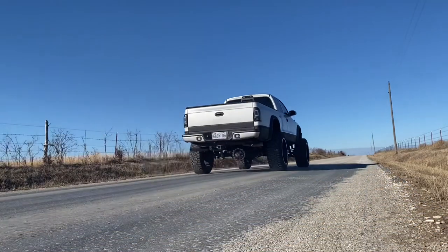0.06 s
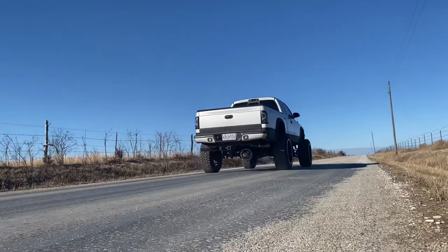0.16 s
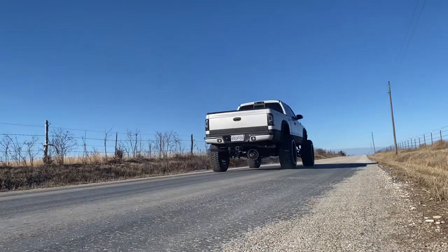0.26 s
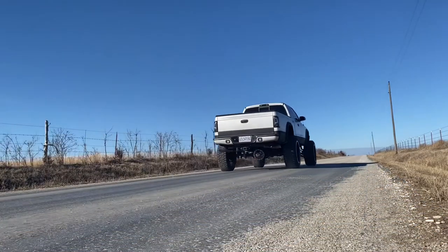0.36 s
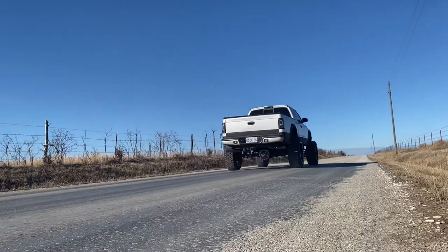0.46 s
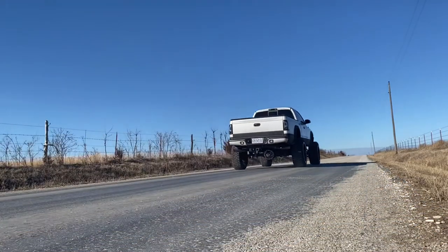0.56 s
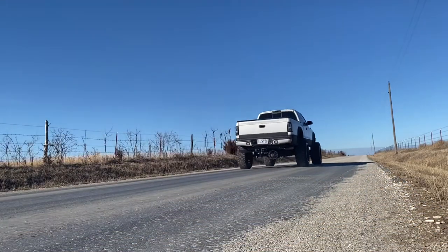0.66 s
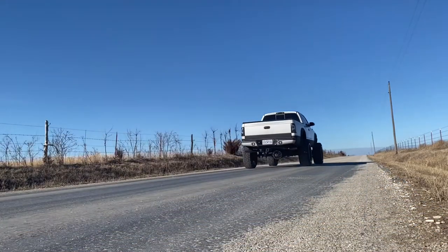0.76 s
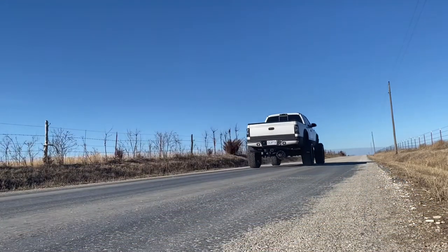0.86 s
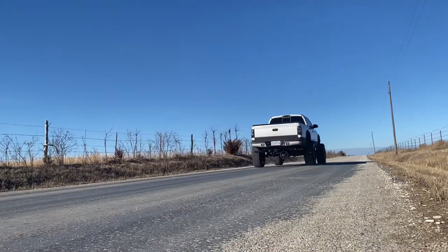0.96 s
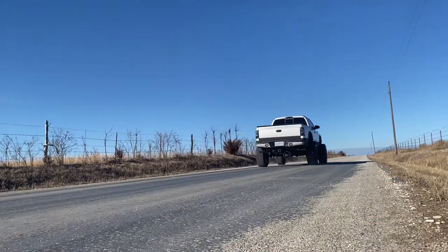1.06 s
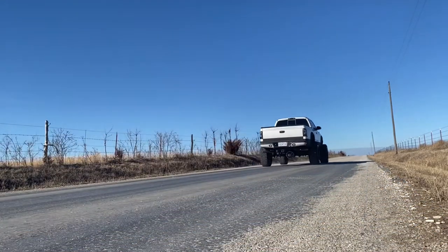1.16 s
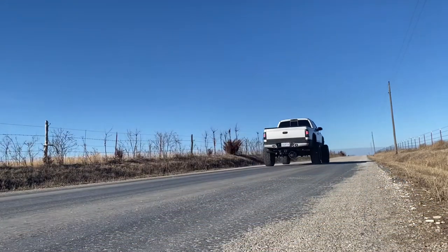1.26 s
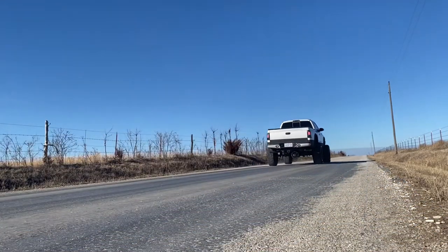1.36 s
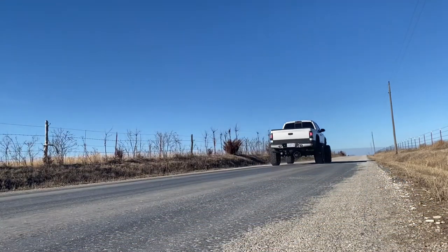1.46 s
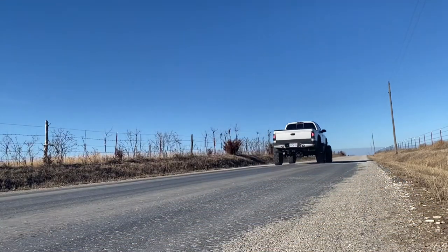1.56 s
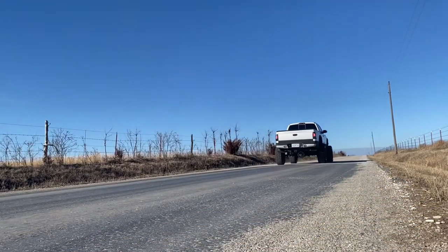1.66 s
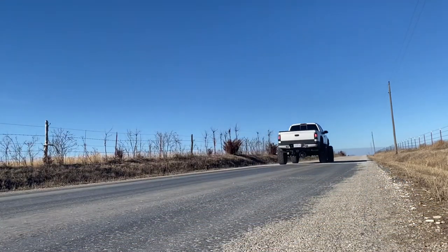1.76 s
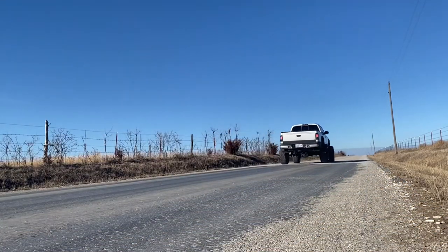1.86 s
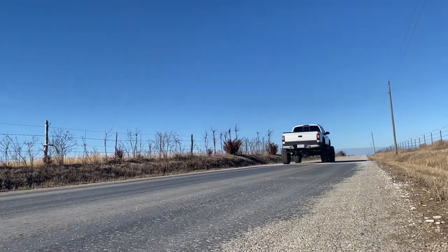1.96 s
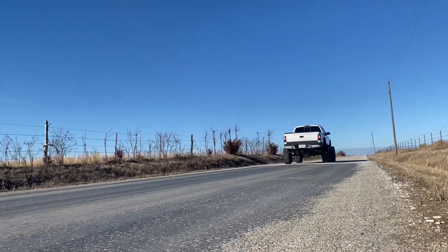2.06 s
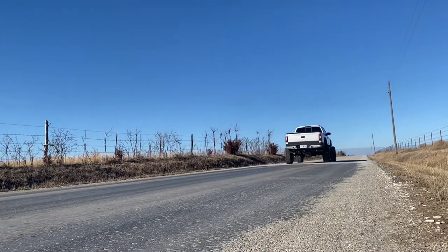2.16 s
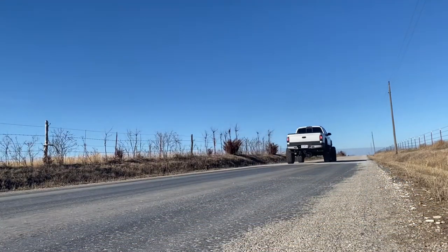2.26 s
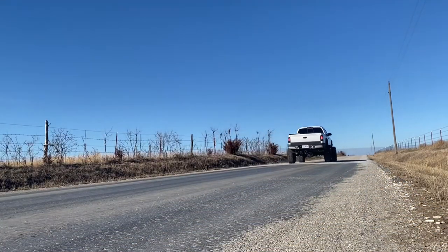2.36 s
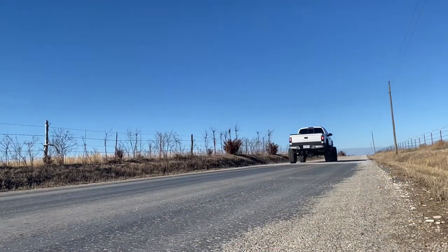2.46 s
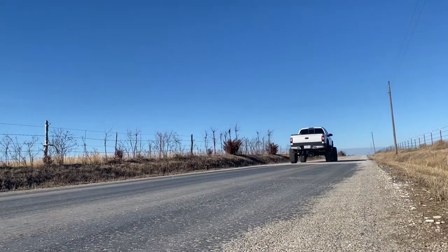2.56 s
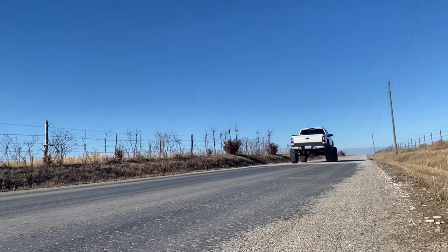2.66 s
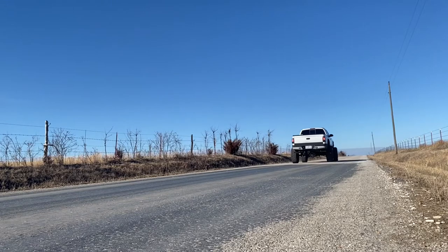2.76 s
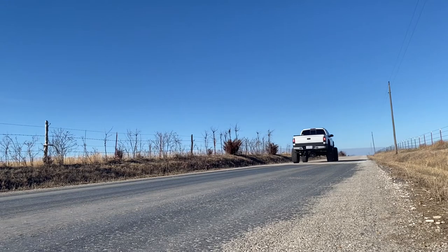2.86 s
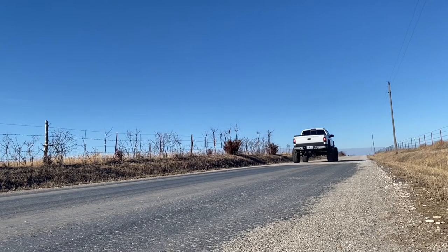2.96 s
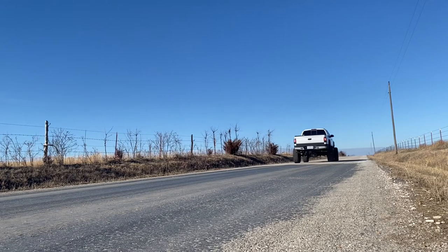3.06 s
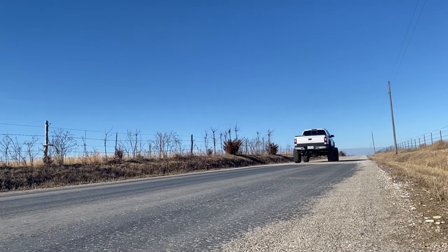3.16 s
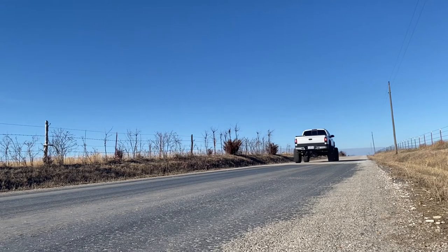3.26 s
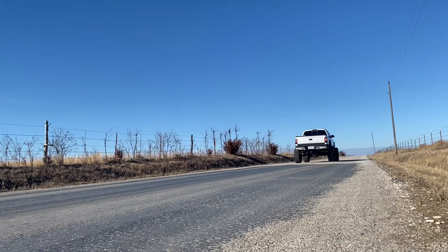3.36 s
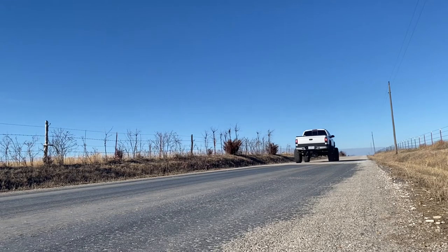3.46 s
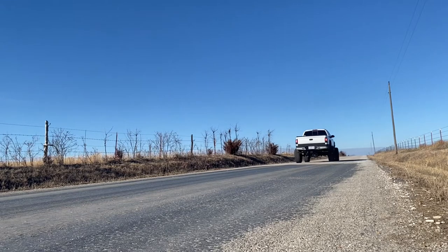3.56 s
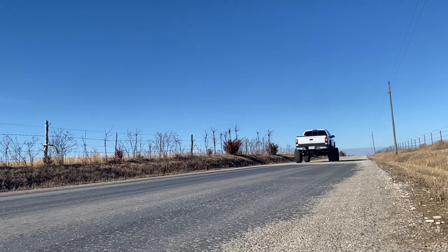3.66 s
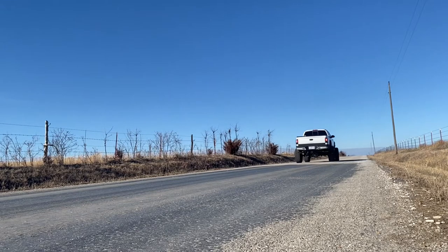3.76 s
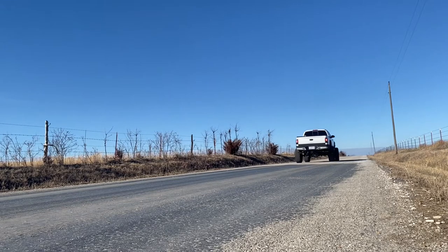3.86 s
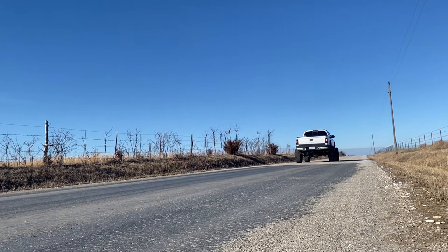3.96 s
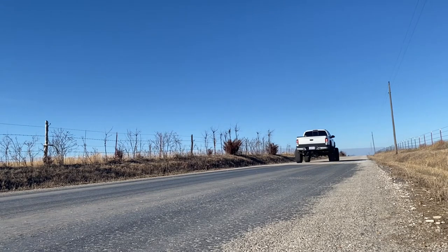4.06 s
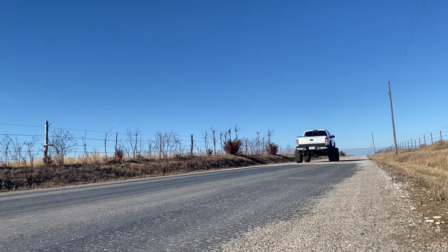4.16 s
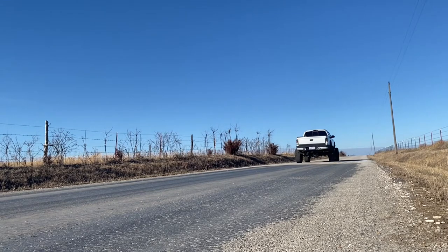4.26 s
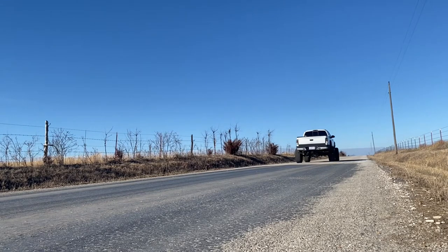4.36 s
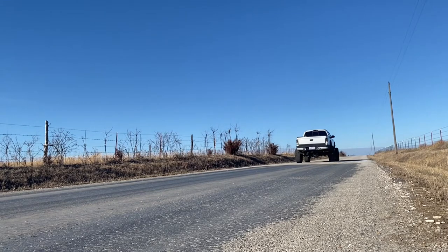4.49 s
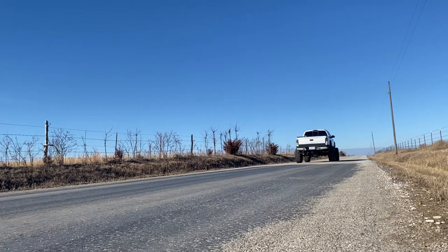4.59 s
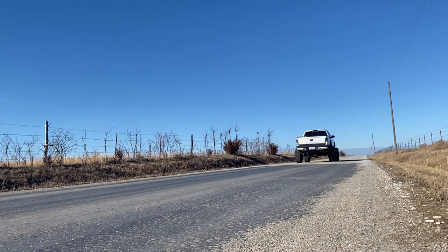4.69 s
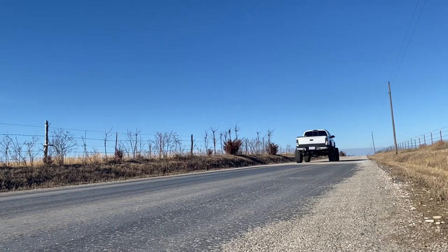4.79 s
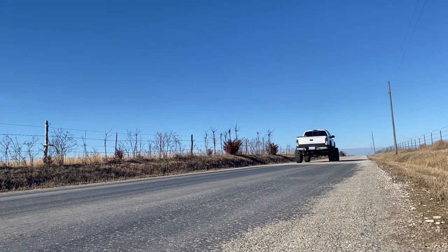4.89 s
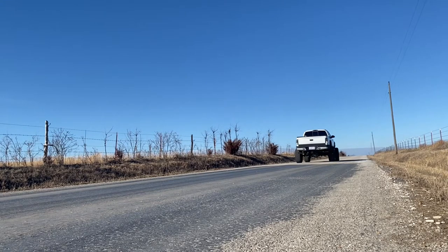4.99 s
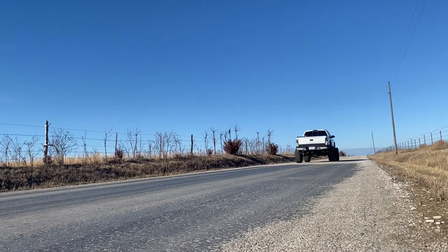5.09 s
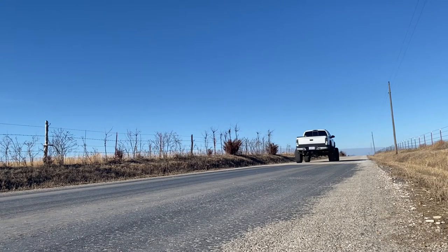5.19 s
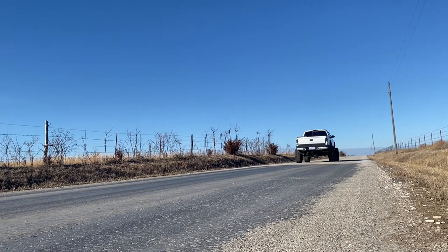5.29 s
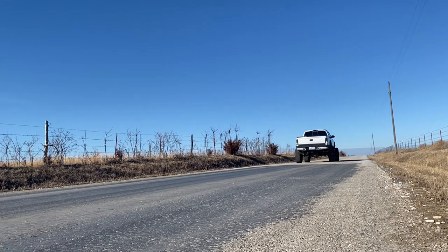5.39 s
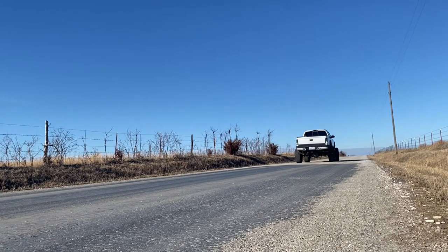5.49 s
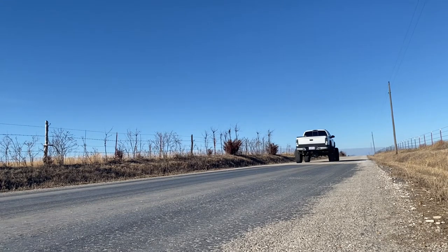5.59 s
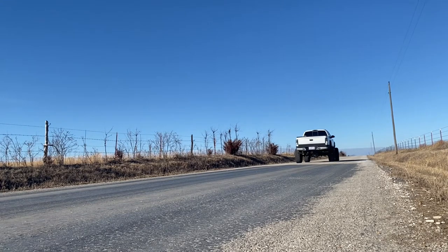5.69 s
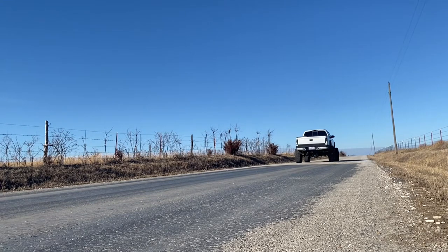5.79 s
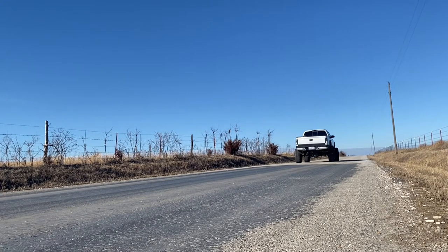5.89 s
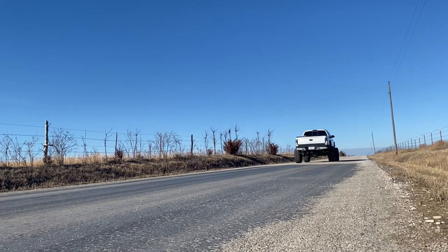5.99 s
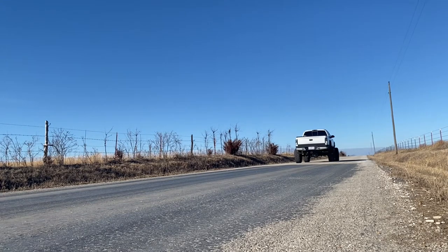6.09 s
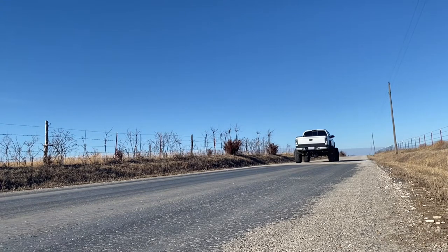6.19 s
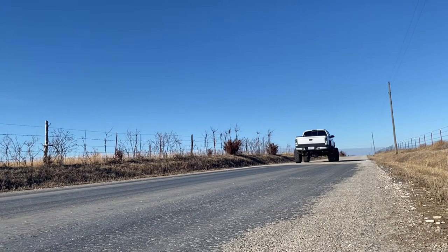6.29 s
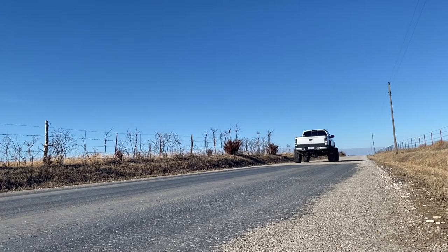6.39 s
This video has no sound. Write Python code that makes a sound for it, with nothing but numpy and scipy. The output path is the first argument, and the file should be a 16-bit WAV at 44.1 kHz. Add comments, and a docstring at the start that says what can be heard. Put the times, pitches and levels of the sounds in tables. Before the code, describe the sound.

On an open rural roadside, a lifted V8 pickup is already close and moving away. From 0 s a deep, pulsing exhaust drone around 160 Hz sits over broad, gritty tyre roar, while wind rumbles on the microphone. Engine speed rises to about 1.9 s, the drone fullest near 1 s; very short, thin brake squeaks occur near 0.2 and 1.4 s. Tyres fade steadily and revs sink as the truck halts at 3.1 s, with hard wind thumps around 2.5 s. A low idle remains, with light clatter and dull knocks. From about 4 s the engine climbs, raspy and rattling, peaking near 5.1 s with a strong drone, then sinks to a quieter lull around 5.9 s. At 6.0 s it revs abruptly, brighter and harsher, with clatter and rushing intake air, still high when the sound cuts at 6.4 s. Small gusts continue throughout.

```python
"""A throbbing engine drone, over tyre roar and wind, opens the scene: a V8 pickup rolls away and brakes to a halt.
Uneven firing pulses ring pipe resonances for the drone, and rasp and clatter grow as the throttle opens.
Coloured noise makes the tyres, fan, rushing air and wind; short wavering tones make the brake squeaks.
Knocks are short noise bursts. After the halt the engine revs up, sinks and revs up again."""
import sys
import numpy as np
from scipy import signal
from scipy.fft import rfft, irfft, next_fast_len
from scipy.io import wavfile
from scipy.ndimage import uniform_filter1d

SR = 44100
rng = np.random.default_rng(int(sys.argv[2]) if len(sys.argv) > 2 else 0)


def master(y):
    """Save y as 16-bit WAV."""
    cut = np.clip(np.atleast_2d(y).T, -1, 1)
    pcm = np.round(cut * 32767)  # scale
    wavfile.write(sys.argv[1], SR, pcm.astype(np.int16))


N = 284004
TIME = np.arange(N) / SR  # seconds

# Engine speed. Each row: time in seconds, four-stroke cycles per second.
ENGINE_SPEED = [(0, 7.15), (.75, 7.15), (1.45, 8.12), (1.9, 8.26), (2.3, 7.7), (2.7, 5.91), (3.05, 5.62),
                (3.45, 5.52), (3.75, 5.66), (4.1, 5.93), (4.35, 6.43), (4.6, 6.81), (4.9, 7.65),
                (5.15, 7.81), (5.45, 7.42), (5.75, 6.51), (5.98, 5.98), (6.12, 6.6), (6.26, 7.99),
                (6.44, 7.94)]
# Throttle, given as a level that steers the engine sounds. Each row: time in seconds, level in dB.
THROTTLE_LEVEL = [(2.7, -96), (2.95, -65.5), (3.5, -64), (3.8, -63.5), (4.15, -63), (4.9, -58.5),
                  (5.5, -60), (5.7, -66), (5.9, -70.5), (6.02, -64.5), (6.1, -56.5), (6.2, -54),
                  (6.44, -54.5)]
# Colour of white turbulence, equally strong at every pitch. Each row: frequency in Hz, relative level in dB.
WHITE = [(30, 0), (15000, 0)]
IDLE_CYCLES_PER_S, CLOSED_THROTTLE_DB = 5.5, -65
# The truck slows evenly from its starting distance until it halts.
START_M, HALT_M, HALT_S = 8.9, 14.2, 3.12
VALVE_LAG_S = .009  # a valve tap follows each rap by this much


def from_db(db):
    """Turn decibels into a plain gain."""
    return 10 ** (np.asarray(db) / 20)


def rms_one(x):
    """Scale a sound to an average (rms) level of 1."""
    return x / np.sqrt(np.mean(x ** 2) + 1e-20)


def in_time(rows):
    """One curve per column after the time, joined by straight lines."""
    s, *columns = np.transpose(rows)
    return [np.interp(TIME, s, column) for column in columns]


def at_hz(points, hz):
    """Read a spectrum between its points on a log-frequency axis."""
    knots, values = np.transpose(points)
    return np.interp(np.log(hz + 1e-3), np.log(knots), values)


def band(x, low_hz, high_hz):
    """Keep the sound between two frequencies (Butterworth band-pass)."""
    return signal.sosfilt(signal.butter(2, [low_hz, high_hz], "band", fs=SR, output="sos"), x)


def evened(x, low_hz, high_hz, seconds):
    """Scale the sound so that its running level inside a band is about 1."""
    power = np.mean(np.atleast_2d(band(x, low_hz, high_hz)) ** 2, axis=0)
    size = int(seconds * SR)
    smooth_power = uniform_filter1d(uniform_filter1d(power, size), size)
    return x / np.sqrt(smooth_power + 1e-20)


def noise(colour, gate=1):
    """Stereo noise, gated and then coloured, with an rms of 1; left and right are partly alike."""
    # How alike left and right are. Each row: frequency in Hz, likeness from 0 to 1.
    likeness = [(30, 0.59), (80, .93), (163, 0.65), (290, .8), (600, 0.92), (1100, 1), (2080, 1), (4000, 1),
                (4700, 0.67), (5300, 0.54), (6200, 0.39), (7200, 1), (8000, .7), (9000, 1), (12000, .9)]
    size = next_fast_len(N + 4096)
    hz = np.fft.rfftfreq(size, 1 / SR)
    mid, side = rfft(rng.standard_normal((2, N)) * gate, size) * from_db(at_hz(colour, hz))
    alike = np.clip(at_hz(likeness, hz), 0, .995)
    spectrum = np.sqrt(1 + alike) * mid + np.sqrt(1 - alike) * side * [[1], [-1]]
    return rms_one(irfft(spectrum, size)[:, :N])


def resonate(x, modes):
    """Add up resonances side by side; a narrower one rings for longer."""
    out = 0
    for hz, width_hz, db in modes:
        r = np.exp(-np.pi * width_hz / SR)  # how much of the ringing survives each sample
        feed = [(1 - r * r) / 2, 0, (r * r - 1) / 2]
        ringing = [1, -2 * r * np.cos(2 * np.pi * hz / SR), r * r]
        out = out + from_db(db) * signal.lfilter(feed, ringing, x + 1e-18)
    return out


def ring_steeply(x, hz, width_hz, db):
    """One resonance applied twice, for steep flanks."""
    return resonate(resonate(x, [(hz, width_hz, db)]), [(hz, width_hz, 0)])


def swell(s, half):
    """A bell-shaped rise and fall, down to about 0.6 at half seconds from its peak."""
    return np.exp(-.5 * ((TIME - s) / half) ** 2)


def placed(x, pan_db):
    """Left louder than right by pan_db."""
    return x * from_db([[pan_db / 2], [-pan_db / 2]])


def roadside(x, db=-18.5):
    """Three weak echoes return from the verges and the earth bank."""
    out = x.copy()
    for k, lag_s in enumerate([.0137, .0291, .0523]):
        lag = int(lag_s * SR)
        out[:, lag:] += from_db(db - 2 * k) * x[:, :-lag]
    return out


def road_speed():
    """Speed as a share of the starting speed, falling evenly to zero."""
    return np.clip(1 - TIME / HALT_S, 0, 1)


def nearness():
    """Gain that falls as distance grows, 1 where the truck halts."""
    return HALT_M / (HALT_M - (HALT_M - START_M) * road_speed() ** 2)


def crank_turns(start_turn=.48):
    """Four-stroke cycles counted so far: the engine speed summed over time."""
    return start_turn + np.cumsum(in_time(ENGINE_SPEED)[0]) / SR


def octaves_above_idle():
    """Engine speed in doublings above idle."""
    return np.log2(in_time(ENGINE_SPEED)[0] / IDLE_CYCLES_PER_S)


def firings(uneven_db, jitter_ms, pipe_delays=True):
    """Eight pulses a cycle, each with its cylinder's strength, pipe delay if wanted, and a little chance."""
    # Cylinders in firing order. Each row: strength in dB, lateness at the tailpipe in milliseconds.
    cylinders = [(-2, 0.63), (2.5, 1.88), (-0.9, 3), (3, 0.39), (2.5, 2.5), (-4.5, 2.5), (2, 1.5), (2, 5)]
    turns = crank_turns()
    count = np.arange(np.ceil(turns[0] * len(cylinders)), turns[-1] * len(cylinders)).astype(int)
    db, late_ms = np.array(cylinders)[count % len(cylinders)].T
    chance = rng.standard_normal((len(count), 2))
    on_time = np.interp(count / len(cylinders), turns, TIME)
    s = on_time + (late_ms * pipe_delays + jitter_ms * chance[:, 0]) / 1000
    pulses = np.zeros(N)
    pulses[np.clip(s * SR, 0, N - 1).astype(int)] = from_db(db + uneven_db * chance[:, 1])
    return pulses


def varied(pulses, spread_db):
    """The same pulses, each made stronger or weaker by chance."""
    out = pulses.copy()
    out[pulses > 0] *= from_db(spread_db * rng.standard_normal(np.count_nonzero(pulses)))
    return out


def puffs(pulses, decay_s):
    """Each firing lets out a puff of gas that dies away exponentially."""
    return rms_one(signal.lfilter([1], [1, -np.exp(-1 / (decay_s * SR))], pulses))


def pipe_gain(law):
    """A pipe tone grows with throttle and revs, shifts in level while rolling, and fades with distance."""
    idle_db, throttle_share, db_per_octave, rolling_db = law
    throttle_db = np.maximum(in_time(THROTTLE_LEVEL)[0] - CLOSED_THROTTLE_DB, 0)
    engine_db = idle_db + throttle_share * throttle_db + db_per_octave * octaves_above_idle()
    return nearness() * from_db(engine_db + rolling_db * np.sqrt(road_speed()))


def exhaust(pulses):
    """Firing pulses and turbulent gas make the pipes boom, and growl and bark at higher resonances."""
    # Pipe and silencer resonances. Each row: frequency in Hz, width in Hz, relative strength in dB.
    drone_modes = [(60, 5.6, -29.5), (105, 14, -29), (160.6, 12.6, 12), (174, 5.4, -19.5)]
    growl_modes = [(236.6, 4.4, -3.5), (262.3, 9.6, 1.5), (294.3, 7, -3.5), (345, 20, -15)]
    bark_modes = [(464.4, 5.4, -1.1), (494.3, 6.7, 0.7)]
    # Drone at the pipes' quarter-wave note. Each row: time in seconds, level in dB before throb and trim.
    drone_level = [(0, -20), (0.75, -20.5), (1.05, -17), (1.5, -25), (2.6, -27), (3.0, -38.5),
                   (3.65, -25.5), (4.25, -45), (4.58, -35.5), (4.7, -23.5), (4.87, -18.5), (5.5, -20),
                   (5.7, -33.5), (6.05, -37), (6.22, -20), (6.44, -43.5)]
    # How deeply the drone surges once a cycle. Each row: engine cycles per second, depth in dB.
    throb_depth = [(7.45, 1.2), (7.8, 4.2)]
    # How growl and bark grow. Each holds: dB at idle, share of the throttle's rise,
    # dB per octave of engine speed, dB added at the starting road speed.
    growl_law = (-47.5, 1.03, 11.5, -2)
    bark_law = (-57, .5, 8.5, 8.5)
    depth_db = np.interp(in_time(ENGINE_SPEED)[0], *np.transpose(throb_depth))
    throb_db = depth_db * np.cos(2 * np.pi * crank_turns())
    turbulence = noise(WHITE, puffs(pulses, decay_s=0.012))
    smooth_flow = rms_one(pulses) + from_db(-17) * turbulence
    rough_flow = rms_one(pulses) + from_db(-5) * turbulence
    drone = evened(band(resonate(smooth_flow, drone_modes), 45, 225), 140, 190, .16)
    growl = band(band(resonate(rough_flow, growl_modes), 205, 385), 205, 385)  # twice, for steep flanks
    growl = evened(growl, 220, 390, .16)
    bark = evened(band(resonate(rough_flow, bark_modes), 440, 540), 450, 520, .16)
    lows = drone * from_db(in_time(drone_level)[0] + throb_db - 1.48) + growl * pipe_gain(growl_law)
    return placed(lows, pan_db=0.65) + placed(bark * pipe_gain(bark_law), pan_db=-0.5)


def tyres():
    """Tread roar is noise with a fine crackle of grit, fading as the truck draws away and slows."""
    # Each row: frequency in Hz, relative level in dB per Hz.
    tyre_colour = [(150, -15.5), (290, -9), (350, 6.5), (410, -7.5), (620, -2), (740, 1.5), (785, -3),
                   (850, 3), (960, -6), (1150, -6), (1450, -15.5), (2000, -16.5), (2900, -27.5),
                   (4100, -30), (5200, -35.5), (6200, -40.5), (7200, -37), (9000, -43), (11000, -42.5),
                   (15000, -49)]
    start_db, speed_power = -37.5, 0.57  # level at the start; power of road speed it follows
    grit = (rng.random(N) < 300 / SR) * np.minimum(rng.exponential(3.2, N), 9)  # about 300 grains a second
    roar = evened(noise(tyre_colour, 1 + grit), 550, 1600, 0.22)
    gain = from_db(start_db) * road_speed() ** speed_power * nearness() * START_M / HALT_M
    return placed(roar * gain, pan_db=-0.2)


def fan():
    """The cooling fan is a smooth noise hiss that gets louder with engine speed."""
    # Each row: frequency in Hz, relative level in dB per Hz.
    fan_colour = [(350, -11.5), (820, -2), (1450, -17.5), (2200, -14), (3300, -28.5), (4200, -25.5),
                  (5300, -29), (6000, -39), (9000, -43), (14000, -53.5)]
    idle_db, db_per_octave = -62, 12.5
    gain = from_db(idle_db + db_per_octave * octaves_above_idle())
    return placed(noise(fan_colour) * gain, pan_db=0.0)


def wind(steady_db=4.5):
    """Wind rumbles at the microphone; gusts swell it, and their sharp eddies reach higher in pitch."""
    # Colours of the rumble and of the sharp eddies. Each row: frequency in Hz, relative level in dB per Hz.
    wind_colour = [(20, -37), (32, -19), (48, -7.5), (70, -3.5), (110, -7), (170, -12.5), (260, -28.5),
                   (500, -45), (1500, -77), (6000, -115)]
    buffet_colour = [(30, -15), (70, 1.5), (130, 4.5), (230, 2), (330, -7.5), (450, -17.5), (580, -30),
                     (1500, -59.5), (6000, -100)]
    # Steady part of the wind. Each row: time in seconds, level in dB before steady_db is added.
    wind_level = [(0.05, -24.5), (0.3, -35), (0.85, -33.5), (1.35, -35.5), (1.7, -32.5), (1.95, -33),
                  (2.3, -31.5), (2.7, -29.5), (2.9, -37), (3.15, -44.5), (3.4, -44), (3.6, -38),
                  (3.95, -42), (4.4, -36.5), (5.1, -39), (5.65, -37.5), (5.87, -42.5), (6.1, -34),
                  (6.4, -36.5)]
    # Gusts. Each row: peak in seconds, level in dB, half length in seconds, share of sharp eddies from 0 to 1.
    gusts = [(0.346, -19, .03, .14), (0.638, -21, 0.02, 0.1), (1.006, -21.5, .018, 0.06),
             (1.428, -18, .012, 0.5), (1.482, -20.5, 0.015, .05), (1.574, -21.5, 0.027, 0.5),
             (1.771, -20, 0.023, 0.5), (1.851, -22, .018, 0.2), (2.012, -17, 0.033, 0),
             (2.098, -17.5, 0.0098, .05), (2.418, -21.5, 0.011, 0.3), (2.504, -18, 0.008, 1),
             (2.551, -12.5, .012, 0.4), (2.611, -10.5, 0.0054, 0.58), (2.739, -18, 0.025, 0.4),
             (2.792, -21, .013, 0), (2.981, -24, 0.0092, .5), (3.012, -33.5, 0.0046, 1),
             (3.072, -21, .006, .57), (3.509, -22.5, 0.015, .65), (3.63, -22.5, .01, .65),
             (3.754, -25.5, 0.014, 0.8), (3.823, -29.5, 0.052, 0.93), (3.846, -22.5, .007, 0.85),
             (3.892, -18, .005, 0.7), (3.917, -21, 0.0083, 0.99), (3.947, -18.5, .008, 0.5),
             (4.014, -25.5, .008, 0.5), (4.095, -29.5, 0.021, 0.09), (4.459, -28.5, 0.018, 0.2),
             (4.614, -24, 0.0072, 1), (5.151, -16, .01, 0.2), (5.472, -23.5, 0.0088, 1),
             (5.569, -26, .022, 1), (5.631, -25, 0.022, .3), (5.762, -23, 0.0077, 0.2),
             (5.911, -24, 0.0061, 0.7), (5.948, -24, .02, 0.97), (6.44, -16.5, 0.018, 0.38)]
    low, sharp = from_db(in_time(wind_level)[0] + steady_db), 0
    for s, db, half, share in gusts:
        gust = from_db(db) * swell(s, half)
        share = np.clip(share, 0, 1)
        low = np.hypot(low, (1 - share) * gust)  # powers add
        sharp = sharp + share * gust
    rumble = low * evened(noise(wind_colour), 27, 105, 0.12)
    eddies = sharp * evened(noise(buffet_colour), 40, 500, 0.025)
    return placed(rumble + eddies, pan_db=0.3)


def open_air():
    """A faint, steady bed of coloured noise lies under everything."""
    # Each row: frequency in Hz, relative level in dB per Hz.
    air_colour = [(100, 0), (400, -11.5), (1000, -9.5), (1600, -20.5), (2400, -25.5), (3500, -34.5),
                  (5500, -39.5), (7300, -39), (14000, -48)]
    return from_db(-55.5) * noise(air_colour)


def brakes():
    """A pad sings briefly on its disc: sine tones, slightly unsteady in pitch."""
    # Each row: peak in seconds, level in dB, half length in seconds, frequency in Hz.
    squeaks = [(0.194, -65, 0.021, 3700), (1.385, -58.5, 0.017, 6920), (1.417, -47.5, 0.004, 1905),
               (1.418, -59.5, 0.004, 3840), (1.485, -68.5, 0.005, 6900), (1.516, -71, 0.008, 6940)]
    waver = np.cumsum(rng.standard_normal(N)) * 0.011  # phase wander in radians
    out = 0
    for s, db, half, hz in squeaks:
        tone = np.sqrt(2) * np.sin(2 * np.pi * hz * TIME + waver)
        out = out + from_db(db) * swell(s, half) * tone
    return placed(out, pan_db=3.5)


def rasp(pulses, steady=0.39):
    """Puffs of gas ring the higher pipe resonances, each with a strength of its own, so they flutter."""
    # Each row: frequency in Hz, width in Hz, relative strength in dB.
    rasp_modes = [(623.5, 29, 10), (756.4, 48, 12), (805.5, 66, 11.5), (877, 46, 7.5), (1065, 33, 10.5),
                  (1200, 70, 6.5), (1285, 25, 2)]
    closed_db, throttle_share, spread_db = -54, 0.92, 4.2
    turbulence, out = noise(WHITE), 0
    for mode in rasp_modes:
        uneven = varied(pulses, spread_db)
        gas = turbulence * (steady + puffs(uneven, decay_s=.0045)) + from_db(-8) * rms_one(uneven)
        out = out + ring_steeply(gas, *mode)
    db = closed_db + throttle_share * (in_time(THROTTLE_LEVEL)[0] - CLOSED_THROTTLE_DB)
    return placed(evened(roadside(out), 700, 1300, 0.2) * from_db(db), pan_db=0.0)


def raps():
    """One rap per firing; a hard one comes out of step and takes the place of its neighbours."""
    # Firings that knock hard. Each row: time in seconds, strength in dB.
    hard_firings = [(3.374, 3.5), (3.485, 3.5), (3.537, 4), (3.554, 3), (3.662, 4), (3.796, 6), (3.904, 5),
                    (3.949, 4.5), (4.062, 6), (4.08, 7), (4.243, 3.5), (4.343, 7), (4.402, 9.5), (4.458, 3),
                    (4.495, 8), (4.551, 4), (4.642, 4.5), (4.714, 2), (4.781, 6.5), (4.865, 4),
                    (4.914, 4.5), (4.963, 4), (5.081, 5.5), (5.223, 4), (5.273, 5), (5.437, 4.5),
                    (6.042, 4.5), (6.1, 6.5), (6.172, 5.5), (6.183, 4.5)]
    lead_s = .004  # the block raps just before the gas leaves the pipe
    even = np.sqrt(firings(uneven_db=3.0, jitter_ms=1.2, pipe_delays=False))  # the root halves every dB
    out = np.roll(even, -int(lead_s * SR))
    for s, db in hard_firings:
        out[np.abs(TIME - s) < VALVE_LAG_S] = 0
        out[int(s * SR)] = from_db(db)
    return out


def clatter(steady=.06, grit=.9):
    """Combustion raps and lighter valve taps ring the block; the two cylinder banks ring slightly apart."""
    # Resonances of the engine block. Each row: frequency in Hz, width in Hz, relative strength in dB.
    block_modes = [(1250, 150, -4), (2005, 110, 7), (2163, 200, 4), (2390, 43, -8.5), (2845, 150, -5.5),
                   (3800, 150, -10), (4170, 170, -13), (5200, 410, -17.5)]
    # Very faint at first and again in the lull between the two revs. Each row: time in seconds, level in dB.
    clatter_level = [(2.7, -85), (2.9, -71.5), (3.5, -66.5), (3.7, -62.5), (4.15, -62), (4.45, -58.5),
                     (4.95, -57.5), (5.15, -60.5), (5.5, -72), (5.66, -78), (5.9, -80), (5.99, -66),
                     (6.09, -51.5), (6.18, -48.5), (6.26, -50), (6.44, -50.5)]
    decay_s, spread_db, bank_detune, valve_db = .0033, 2.0, .012, -10
    hits = raps()
    bank = np.cumsum(hits > 0) % 2  # raps alternate between the banks
    grain, out = noise(WHITE), 0
    for side, detune in enumerate((1 - bank_detune, 1 + bank_detune)):
        own = hits * (bank == side)
        own = own + from_db(valve_db) * np.roll(own, int(VALVE_LAG_S * SR))
        for hz, width_hz, db in block_modes:
            blows = varied(own, spread_db)
            force = rms_one(blows) + grain * (grit * puffs(blows, decay_s) + steady)
            out = out + ring_steeply(force, hz * detune, width_hz, db)
    rattle = roadside(band(out, 900, 7000), db=-18)
    return placed(evened(rattle, 1850, 2500, 0.2) * from_db(in_time(clatter_level)[0]), pan_db=0.0)


def knocks():
    """Short dull knocks within the rasp, and a few brighter: dying noise bursts, each in its own pitch range."""
    # Each row: start in seconds, strength in dB, decay in seconds, lowest and highest frequency in Hz.
    knock_rows = [(3.289, -59.5, 0.011, 1480, 4000), (3.399, -47.5, 0.0046, 600, 1310),
                  (3.744, -59.5, 0.02, 1760, 4050), (3.886, -40.5, .006, 550, 1330),
                  (3.93, -40.5, 0.0056, 550, 1300), (4.06, -44, 0.0066, 650, 1370),
                  (4.22, -42, 0.022, 380, 1450), (4.225, -57, 0.043, 1510, 3600),
                  (4.342, -50, 0.0055, 915, 1400), (4.382, -36.5, 0.007, 447, 1090),
                  (4.534, -37, 0.0074, 600, 1140), (4.68, -42.5, 0.0068, 596, 1170),
                  (4.715, -36, 0.0052, 504, 1100), (5.08, -43, 0.0047, 655, 1250),
                  (6.022, -44.5, .006, 550, 1300)]
    grain, out = rng.standard_normal(N), 0
    for s, db, decay, low_hz, high_hz in knock_rows:
        burst = grain * (TIME >= s) * np.exp(-np.minimum(np.abs(TIME - s) / decay, 20))
        knock = band(band(burst, low_hz, high_hz), low_hz, high_hz)
        makeup = np.sqrt(SR / 2 / (high_hz - low_hz))  # a narrow band lets less noise through
        out = out + from_db(db) * makeup * knock
    return placed(out, pan_db=0.5)


def rush(pulses, steady=.8):
    """Air rushes through the engine in gulps of noise, growing faster than the rasp as the throttle opens."""
    # Each row: frequency in Hz, relative level in dB per Hz.
    rush_colour = [(350, -8), (470, 5.5), (570, -6.5), (700, -11.5), (732, 1), (850, 0.5), (996, -7.5),
                   (1050, -1.5), (1210, -2), (1350, -7.5), (1450, -22.5), (1590, -25), (2150, -5),
                   (2700, -21), (3350, -33), (4150, -24), (4800, -32.5), (5300, -23), (6000, -36),
                   (7300, -35.5), (9000, -40.5), (14000, -51.5)]
    open_db, open_throttle_db, db_per_throttle_db = -40.5, -53.5, 2.5
    db = open_db + db_per_throttle_db * (in_time(THROTTLE_LEVEL)[0] - open_throttle_db)
    gulps = noise(rush_colour, steady + puffs(pulses, decay_s=0.0053))
    return placed(evened(band(gulps, 420, 15000), 420, 3000, .2) * from_db(db), pan_db=-0.3)


def ports(x, response):
    """The microphone housing sets a level and phase difference between left and right at each frequency."""
    size = next_fast_len(N + 4096)
    hz, table = np.fft.rfftfreq(size, 1 / SR), np.array(response)
    level_db, phase = at_hz(table[:, :2], hz), at_hz(table[:, ::2], hz)
    half = from_db(level_db / 2) * np.exp(.5j * phase)  # left gets one half, right the opposite half
    return irfft(rfft(x, size) * [half, 1 / half], size)[:, :N]


def scene():
    """Add up the engine, tyres, brakes, knocks, wind and open air."""
    pulses = firings(uneven_db=1.0, jitter_ms=.18)
    engine = exhaust(pulses) + fan() + rasp(pulses) + clatter() + rush(pulses)
    return engine + tyres() + wind() + open_air() + brakes() + knocks()


def record(dry):
    """The ports colour the sound by its bearing; the deepest bass and the very top are cut."""
    # Sound from ahead, and from the right. Each row: frequency in Hz, left minus right in dB,
    # phase lead of the left in radians.
    ports_ahead = [(30, 0, 0), (400, 0, -.25), (1000, -2.2, -.05), (2000, 0, 0), (4100, 2, 0),
                   (4600, 2.8, -.8), (5200, 2.8, -2.4), (5900, 0, -2.9), (6300, -.6, -6), (7400, .5, -6.4),
                   (8500, 0, -9.3), (9400, 0, -9.5), (10500, 0, -12.5), (11700, 0, -12.6),
                   (12600, 0, -15.7)]
    ports_right = [(30, 0, 0), (160, .3, -.07), (400, .3, -.45), (950, -3.8, -.5), (1900, 0, -.62),
                   (3000, 4.8, -.65), (3700, 4.8, -.9), (4400, 7, -1.4), (5000, 4.8, -3), (5800, -.5, -4),
                   (6300, -1, -5.3), (7400, 1, -6.4), (8500, 0, -9.3), (9400, 0, -9.5), (10500, 0, -12.5),
                   (11700, 0, -12.6), (12600, 0, -15.7)]
    # The sound moves from ahead to the right. Each row: time in seconds, share of the way from 0 to 1.
    bearing = [(.9, 0), (2.0, 1)]
    right = in_time(bearing)[0]
    heard = (1 - right) * ports(dry, ports_ahead) + right * ports(dry, ports_right)
    thinned = signal.sosfilt(signal.butter(2, 24, "high", fs=SR, output="sos"), heard)
    cutoff_hz = 15700
    return signal.sosfilt(signal.ellip(10, .1, 80, cutoff_hz, fs=SR, output="sos"), thinned)


dry = scene()
out = record(dry)
master(out)
```